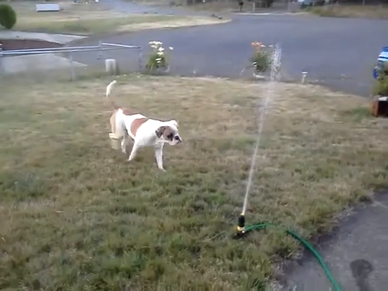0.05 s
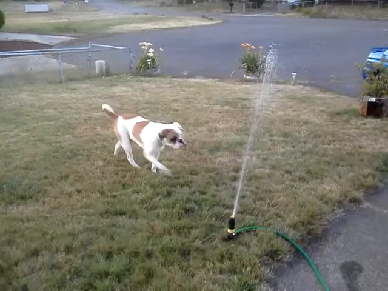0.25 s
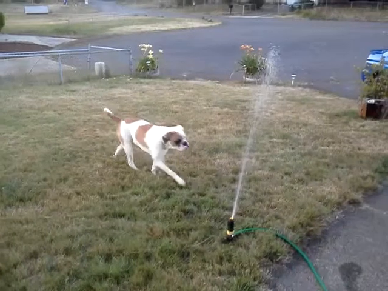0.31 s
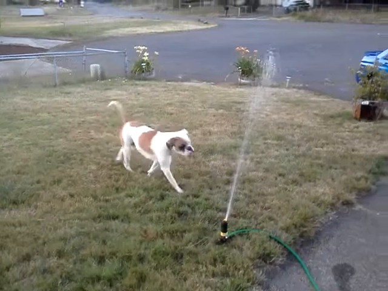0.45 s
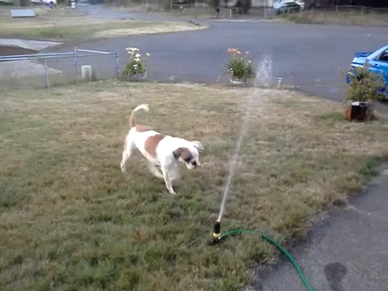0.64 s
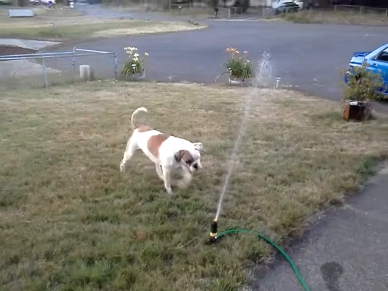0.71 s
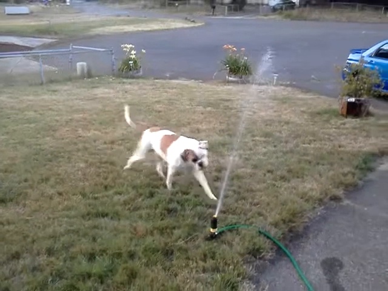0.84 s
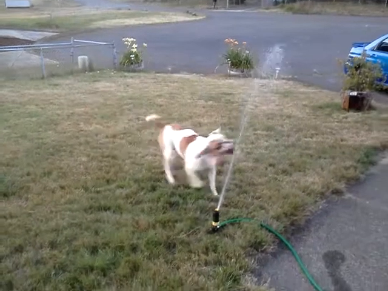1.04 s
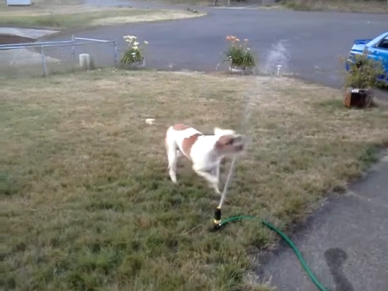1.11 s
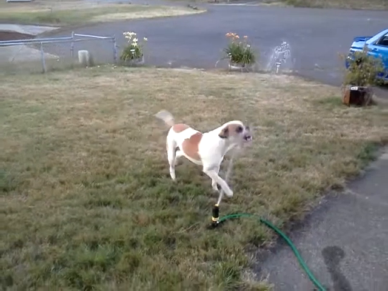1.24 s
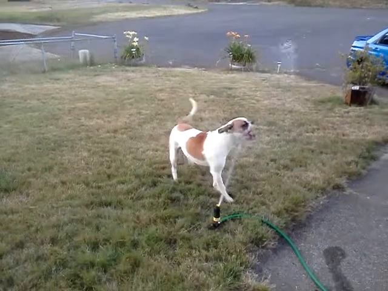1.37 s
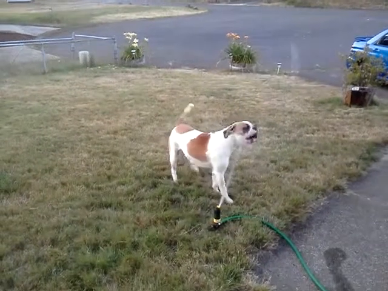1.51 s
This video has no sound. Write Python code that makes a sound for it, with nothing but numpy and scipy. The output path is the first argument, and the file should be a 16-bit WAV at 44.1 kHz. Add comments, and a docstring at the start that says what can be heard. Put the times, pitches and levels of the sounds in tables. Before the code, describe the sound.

A garden sprinkler gives a faint steady hiss. At about 0.2 seconds it starts spitting: bright, dense crackle and sizzle with sharp pops, thickest around 0.4 to 0.7 and snapping strongly again near 1.0. It thins after 1.1 and fades by 1.3 to quiet hiss. Soft paw steps brush wet grass near 1.45, over low outdoor air, a narrow whirr and a faint rising hum.

```python
"""Spitting garden sprinkler

A lawn, the microphone a few metres from the sprinkler. The jet is steady shaped noise; for about a second it spits,
most likely as air from the hose bursts out of the nozzle: random short rings crackle over noise, with lower rushes
and sharp pops, each pop mirrored by the ground. Under it lie soft steps in the grass (swells of noise), a faint
low outdoor noise with a narrow whirr, and a hum of sine tones."""
import sys
import numpy as np
from scipy import signal
from scipy.fft import rfft, irfft
from scipy.io import wavfile
from scipy.ndimage import uniform_filter1d

SR = 44100
rng = np.random.default_rng(int(sys.argv[2]) if len(sys.argv) > 2 else 0)


def master_out(mix):
    """Clip the mix to full scale and print it as 16-bit PCM to the path in sys.argv[1]."""
    frames = np.transpose(np.atleast_2d(mix))
    ceiling = np.clip(frames, -1, 1)
    pcm = np.round(ceiling * 32767).astype(np.int16)
    wavfile.write(sys.argv[1], SR, pcm)


N = 68355
T = np.arange(N) / SR  # time in seconds


def undb(db):
    """Decibels to gain."""
    return 10 ** (np.asarray(db) / 20)


def unit(x):
    """Scale to rms 1."""
    return x / np.sqrt(np.mean(x ** 2))


def response(points, size=4096):
    """Causal (minimum-phase) impulse response of a colour, falling steeply beyond its ends; energy 1."""
    hz, db = np.array(points, float).T
    octave = np.log2(np.maximum(np.arange(size // 2 + 1) * SR / size, 1))
    low, high = np.log2(hz[0]), np.log2(hz[-1])
    beyond = np.maximum(octave - high, 0) + np.maximum(low - octave, 0)
    level_db = np.interp(octave, np.log2(hz), db) - 40 * beyond  # 40 dB per octave outside
    gain = undb(np.maximum(level_db, -80))
    # folding the cepstrum forward in time makes the response causal
    cepstrum = irfft(np.log(gain))
    cepstrum[1:size // 2] *= 2
    cepstrum[size // 2 + 1:] = 0
    h = irfft(np.exp(rfft(cepstrum)))
    return h / np.sqrt(np.sum(h ** 2))


def through(x, h):
    """Filter by an impulse response."""
    return signal.fftconvolve(x, h)[:N]


def noise(points):
    """Steady noise of a colour, rms 1."""
    h = response(points)
    white = rng.standard_normal(N + len(h) - 1)
    return unit(signal.fftconvolve(white, h, "valid"))


def narrow(hz, width_hz):
    """Noise in one resonance, rms 1."""
    offset = (np.arange(N // 2 + 1) * SR / N - hz) / width_hz
    spectrum = rfft(rng.standard_normal(N)) / (1 + 2 * offset ** 2)
    return unit(irfft(spectrum, N))


def walk(rate):
    """Random wander with about `rate` new values a second, smoothed; rms 1."""
    hold = max(int(SR / rate), 1)
    steps = rng.standard_normal(N)[np.arange(N) // hold]
    return unit(uniform_filter1d(uniform_filter1d(steps, hold), hold))


def add(out, start_s, sound):
    """Mix a sound in at a time."""
    i = int(np.clip(start_s * SR, 0, N - 1))
    out[i:i + len(sound)] += sound[:N - i]


def ring(hz, rise_s, size=400):
    """A bursting bubble: a sine whose envelope swells to 1 at rise_s, then dies."""
    age = T[:size]
    envelope = age / rise_s * np.exp(1 - age / rise_s)
    return envelope * np.sin(2 * np.pi * hz * age)


def jet():
    """The smooth jet hisses as steady coloured noise with a slight flicker in level."""
    # Colour of the jet. Each row: frequency in Hz, relative density in dB per Hz.
    hiss = [(1180, -44.5), (2000, -7.5), (2100, -8), (2360, -8.5), (3370, -8), (3650, -6), (4010, -2.5),
            (5060, 5), (6310, -11.5), (7590, -10), (8690, -25.5), (11300, -91), (19100, -120)]
    level_db, flicker_db, flicker_per_s = -42.5, 3.5, 30.0
    return undb(level_db + flicker_db * walk(flicker_per_s)) * noise(hiss)


def gush():
    """Small bubbles of uneven size and pitch crackle over the sizzle of torn water; the flow sputters."""
    # Strength of the spitting, before the layer levels. Each row: time in seconds, level in dB.
    course = [(0, -46), (.19, -46.5), (.212, -31), (.25, -34), (.33, -33), (.375, -29.5), (.42, -33),
              (.49, -33), (.56, -30), (.68, -28), (.77, -28), (.88, -28.5), (.98, -27.5), (1.03, -28.5),
              (1.10, -33.5), (1.21, -32), (1.28, -36.5), (1.33, -47), (1.55, -43)]
    # Colour of crackle and sizzle. Each row: frequency in Hz, relative density in dB per Hz.
    colour = [(1500, -38.5), (2000, -40), (2500, -17), (3100, -13.5), (3900, -8), (4500, -3.5), (5100, 6.5),
              (5700, -3), (6400, -7.5), (7300, -10.5), (8000, -19.5), (8700, -33.5)]
    crackle_db, sizzle_db, tick_db = -2.5, -5.8, -9  # layers relative to the strength
    sputter_db, sputter_per_s = 1.3, 110
    bubbles_per_s, spread_db, rise_s = 1200, 4.8, .00008
    low_hz, high_hz = 1920, 8900  # range of bubble pitches

    strength = undb(np.interp(T, *np.array(course).T) + sputter_db * walk(sputter_per_s))
    sizzle = noise(colour)
    bursts = np.zeros(N)
    chance, pitch = rng.random(N), rng.random(N)
    size = np.minimum(rng.standard_normal(N), 1.7)  # no outsize bubbles
    for i in np.flatnonzero(chance < bubbles_per_s / SR):
        hz = low_hz + pitch[i] * (high_hz - low_hz)
        add(bursts, T[i], undb(spread_db * size[i]) * ring(hz, rise_s))
    crackle = unit(through(bursts, response(colour)))
    return strength * (undb(crackle_db) * crackle + undb(sizzle_db) * sizzle + undb(tick_db) * ticks())


def ticks():
    """The smallest droplets snap one by one as filtered impulses, fine and bright; rms 1."""
    # Colour of a tick. Each row: frequency in Hz, relative density in dB per Hz.
    colour = [(3800, -14.5), (5200, 1.5), (5900, 5), (7300, 0), (8200, -10), (8900, -26)]
    per_s, spread_db = 110, 3.5
    falls = rng.random(N) < per_s / SR
    size = np.minimum(rng.standard_normal(N), 1)
    return unit(through(falls * undb(spread_db * size), response(colour)))


def pops():
    """Each big bubble at the nozzle bursts with a broad snap and a short ring."""
    # Loud pops. Each row: start in seconds, level in dB before the common trim, ring pitch in Hz.
    bubbles = [(0.2142, -18, 5150), (0.2568, -19, 5110), (0.2709, -17, 5750), (0.2954, -19, 5360),
               (0.3057, -13, 4900), (0.3410, -17, 5480), (0.3677, -14, 5380), (0.3856, -17, 5240),
               (0.4066, -6, 5120), (0.4263, -14, 5200), (0.4460, -9, 5150), (0.4553, -16, 5600),
               (0.4706, -16, 5000), (0.5157, -9, 5390), (0.5208, -11, 5050), (0.5254, -9, 5200),
               (0.534, -15, 5600), (0.5511, -10, 5450), (0.5589, -9, 5220), (0.5644, -13, 5300),
               (0.5686, -4.5, 4830), (0.5767, -12, 4890), (0.5867, -13, 5200), (0.5916, -3, 4900),
               (0.5977, -10, 5020), (0.6137, -7, 4890), (0.6326, -13, 5200), (0.6408, -12, 5100),
               (0.6445, -12, 5040), (0.6529, -9, 5040), (0.6772, -6, 5400), (0.6826, -8, 5070),
               (0.6893, -10, 5190), (0.697, -14, 5300), (0.7078, -15, 5250), (0.7129, -15, 5100),
               (0.72, -15, 5450), (0.7517, -10.5, 5350), (0.7972, -17, 5500), (0.847, -15, 5560),
               (0.8558, -13, 5150), (0.8602, -14, 4970), (0.8792, -15, 5200), (0.8986, -12.5, 5100),
               (0.9054, -14, 4840), (0.9275, -13, 5130), (0.9486, -14, 5200), (0.9544, -12, 5140),
               (0.9617, -7, 4900), (0.9859, -13, 5170), (0.9906, -13, 5190), (0.9935, -14, 5100),
               (0.999, -13, 5200), (1.0068, -6, 5050), (1.046, -14, 5000), (1.0506, -15, 5020),
               (1.057, -13, 5530), (1.0664, -1.5, 4900), (1.0774, -12, 4850), (1.1603, -17, 5280),
               (1.1779, -16, 5180), (1.2145, -15, 5220), (1.268, -18, 5650), (1.4658, -21, 5450)]
    # Colour of the snap. Each row: frequency in Hz, relative density in dB per Hz.
    colour = [(1800, -19.5), (3000, -17), (4500, 10), (5500, 2), (7000, 0.5), (8000, -13.5), (9000, -43.5)]
    trim_db, rise_s = -2.2, .00035
    snap_ref_db, snap_ref_hz, snap_db_per_octave = -8.5, 5200, 19.5  # higher pops are snappier

    out, snap = np.zeros(N), response(colour)
    snap = snap / np.abs(snap).max()
    for start_s, db, hz in bubbles:
        snap_db = snap_ref_db + snap_db_per_octave * np.log2(hz / snap_ref_hz)
        add(out, start_s, undb(db + trim_db) * ring(hz, rise_s))
        add(out, start_s, undb(db + trim_db + snap_db) * snap)
    return out


def lawn(x):
    """One quick bounce off the ground and a short, thin scatter thrown back by the yard."""
    ground_lag_s, ground_db = .0018, -7.5
    scatter_s, scatter_db = 0.0032, -15  # decay time constant, level
    tail = rng.standard_normal(N) * np.exp(-T / scatter_s) * (T > ground_lag_s)
    tail = tail / np.sqrt(np.sum(tail ** 2))
    bounce = np.interp(T - ground_lag_s, T, x, left=0)
    return x + undb(ground_db) * bounce + undb(scatter_db) * through(x, tail)


def puffs():
    """Pockets of air in the nozzle give short, lower rushes of narrow noise."""
    # Rushes. Each row: centre in seconds, half length in seconds, level in dB before the band, pitch in Hz.
    pockets = [(.222, 0.028, -36.5, 3000), (.232, 0.013, -36, 4220), (.655, .008, -32, 3400),
               (0.936, 0.01, -33, 3400), (0.9645, 0.0045, -21.5, 4360), (1.009, 0.0027, -26, 3780),
               (1.1, 0.0083, -35, 3670)]
    # Band over all rushes. Each row: frequency in Hz, relative gain in dB.
    colour = [(2000, -12), (2800, -4), (6000, 0.5)]
    width_hz = 1100
    rushes = np.zeros(N)
    for centre_s, half_s, db, hz in pockets:
        swell = np.exp(-((T - centre_s) / half_s) ** 2)
        rushes += undb(db) * swell * narrow(hz, width_hz)
    band = response(colour)
    return through(rushes, band / np.abs(rfft(band)).max())  # peak gain 1


def rustle():
    """Each step brushes the wet grass softly and splashes a little: two noises under one swell."""
    # Soft steps, perhaps a dog's paws.
    # Each row: centre in seconds, half length in seconds, brush level in dB, splash level in dB.
    paws = [(.365, .03, -48, -62), (1.1, .03, -47, -60), (1.425, .02, -44, -51), (1.47, .016, -46, -44)]
    # Colours of brush and splash. Each row: frequency in Hz, relative density in dB per Hz.
    brush_colour = [(350, 0.5), (580, -1.5), (850, -3.5), (1200, -3.5)]
    splash_colour = [(800, -3), (1500, -7), (2100, -1), (2800, -8), (3800, -7), (4500, 4), (6000, -1)]
    brush, splash = noise(brush_colour), noise(splash_colour)
    out = np.zeros(N)
    for centre_s, half_s, brush_db, splash_db in paws:
        swell = np.exp(-((T - centre_s) / half_s) ** 2)
        out += swell * (undb(brush_db) * brush + undb(splash_db) * splash)
    return out


def yard():
    """Low outdoor noise whose octaves waver separately, and a narrow, wavering whirr."""
    # Colour of the outdoor air. Each row: frequency in Hz, relative density in dB per Hz.
    colour = [(25, -4), (40, 3.5), (75, 2), (120, -0.5), (170, -8), (300, -6.5), (430, -8.5), (600, -4),
              (1100, -9.5), (1500, -12.5), (2000, -24.5)]
    air_db, air_waver_db, air_waver_per_s = -44.5, 1.1, 14
    whirr_hz, whirr_width_hz, whirr_db = 1307, 62, -49
    whirr_waver_db, whirr_waver_per_s = .8, 22

    spectrum = rfft(noise(colour))
    octave = np.log2(np.maximum(np.arange(N // 2 + 1) * SR / N, 1))
    centres = np.arange(5, 12)  # 32 Hz to 2048 Hz, as powers of two
    air = np.zeros(N)
    for weights in np.eye(len(centres)):
        band = irfft(spectrum * np.interp(octave, centres, weights), N)
        air += band * undb(air_waver_db * walk(air_waver_per_s))
    whirr_level = undb(whirr_db + whirr_waver_db * walk(whirr_waver_per_s))
    return undb(air_db) * air + whirr_level * narrow(whirr_hz, whirr_width_hz)


def hum():
    """A faint sine tone that swells, fades and creeps upward, over two lower ones of steady level."""
    # Moving tone, perhaps a distant engine. Each row: time in seconds, pitch in Hz, level in dB.
    course = [(0, 258, -63), (.24, 260, -62), (.33, 261, -54), (.5, 260, -56), (.69, 265, -53),
              (.8, 268, -62), (.92, 272, -61), (1.02, 282, -57), (1.28, 294, -55.5), (1.4, 294, -60),
              (1.55, 294, -60)]
    # Lower tones. Each row: mean pitch in Hz, level in dB.
    drone = [(120, -59), (201.5, -64)]
    waver_hz = 2.96  # every pitch wavers by this much

    def tone(hz):
        """Sine following a pitch, rms 1, random starting phase."""
        return np.sqrt(2) * np.sin(2 * np.pi * (np.cumsum(hz) / SR + rng.random()))

    time_s, hz, db = np.array(course).T
    pitch = np.interp(T, time_s, hz) + waver_hz * walk(20.3)
    out = undb(np.interp(T, time_s, db)) * tone(pitch)
    for low_hz, low_db in drone:
        out += undb(low_db) * tone(low_hz + waver_hz * walk(11))
    return out


def scene():
    """Pops, gush, puffs and jet over the steps and the background, on one channel."""
    sprinkler = lawn(pops()) + gush() + puffs() + jet()
    return (sprinkler + rustle() + yard() + hum())[None]


def record(dry):
    """The recorder cuts the top steeply with an elliptic low-pass."""
    top_hz = 8550
    low_pass = signal.ellip(8, .2, 80, top_hz, fs=SR, output="sos")  # 0.2 dB ripple, 80 dB stop
    return signal.sosfilt(low_pass, dry)


dry = scene()
out = record(dry)
master_out(out)
```